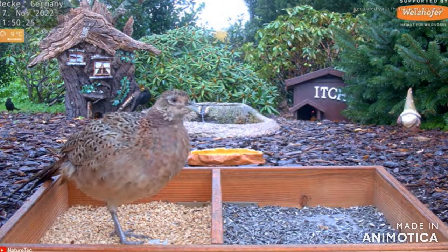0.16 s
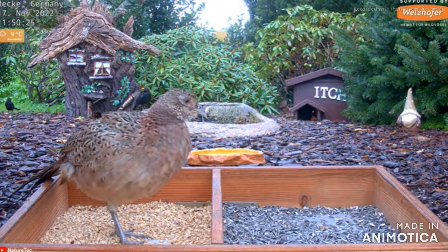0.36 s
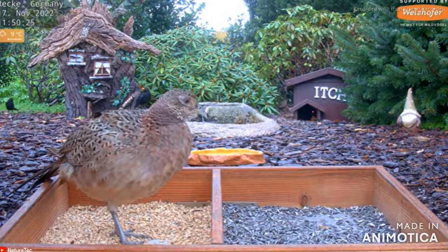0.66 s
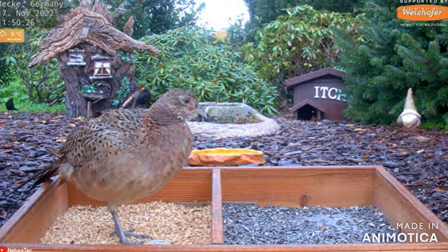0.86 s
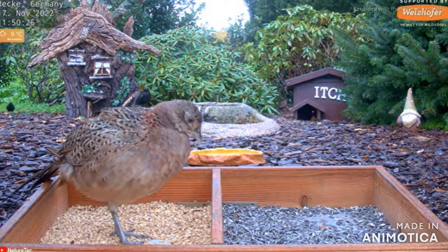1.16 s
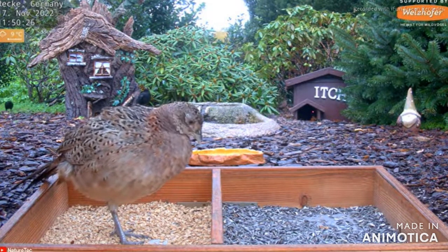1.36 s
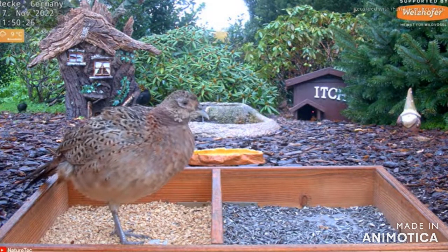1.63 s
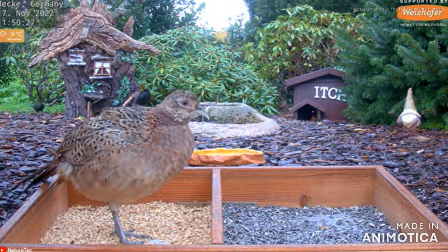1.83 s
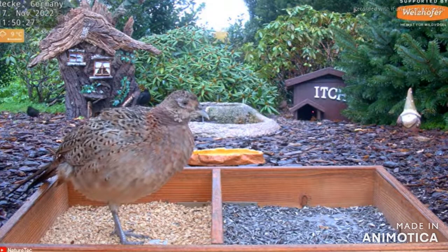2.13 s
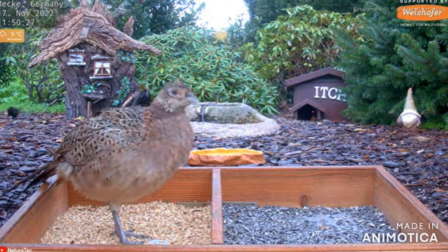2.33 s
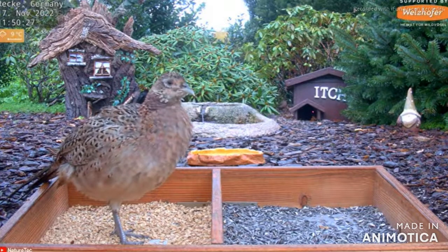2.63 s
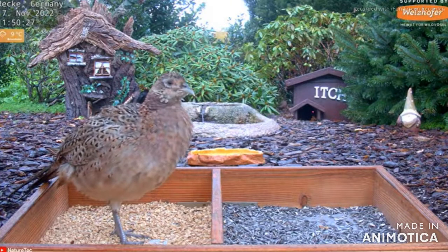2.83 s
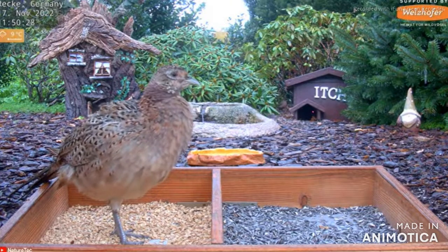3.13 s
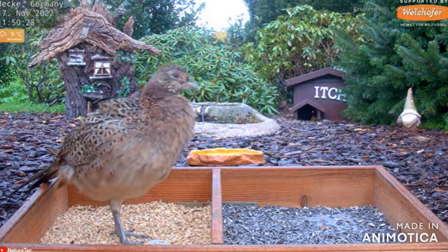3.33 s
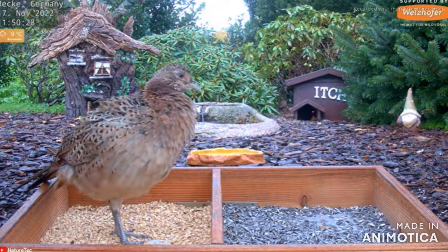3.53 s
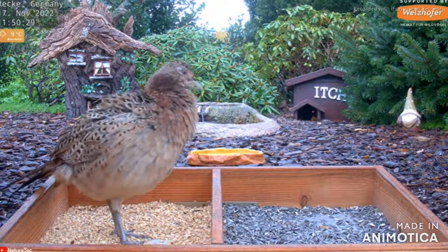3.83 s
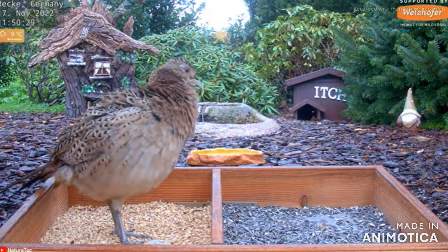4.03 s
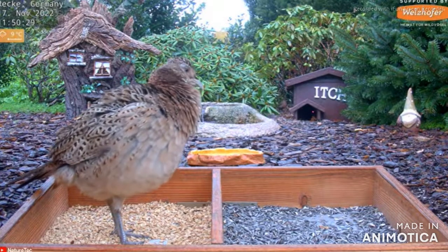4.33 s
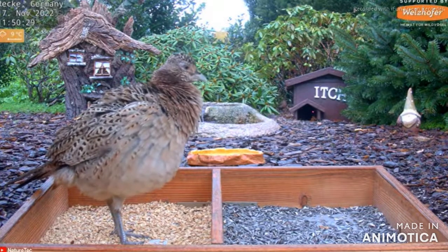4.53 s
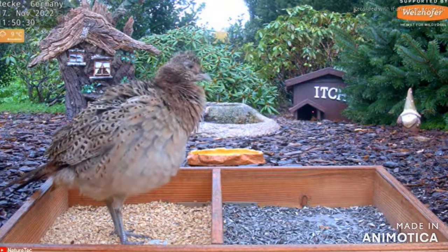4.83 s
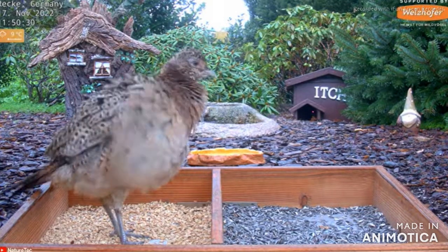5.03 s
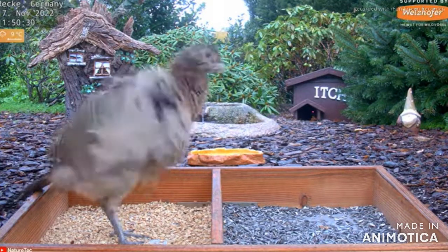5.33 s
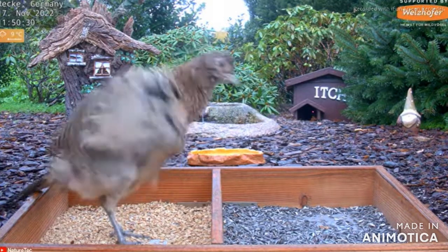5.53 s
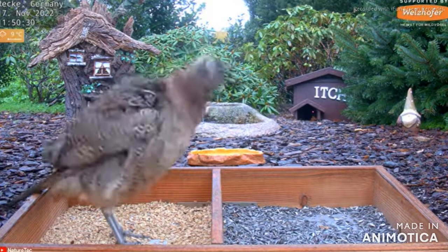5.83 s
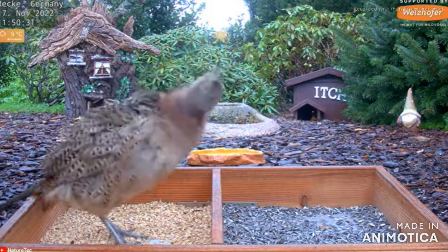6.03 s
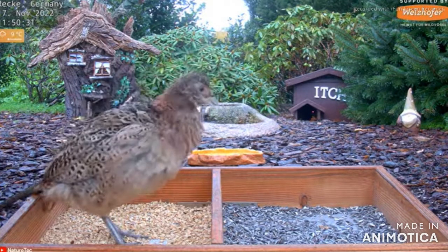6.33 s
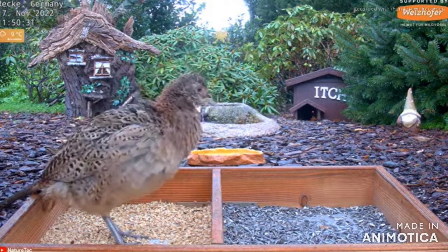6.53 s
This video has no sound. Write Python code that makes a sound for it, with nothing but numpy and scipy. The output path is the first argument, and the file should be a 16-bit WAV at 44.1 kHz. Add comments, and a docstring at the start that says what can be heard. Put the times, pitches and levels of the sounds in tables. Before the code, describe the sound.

Light rain hisses and ticks on wood and seed while sparrows twitter in a hedge; a pheasant shakes wet feathers, then a thin whistle.

```python
"""Garden rain and birds at a feeder

Light rain reaches one small microphone at a wooden feeder: coloured noise makes a soft wash and a far rumble,
and short shaped noise bursts tick on wood and seed. Sliding whistles chatter as sparrows in the hedge.
Dying tones drip into a puddle and step on the tray; a pheasant shakes wet feathers as swelling, grainy noise.
Near the end the tray rocks and a small bird gives one thin, high, warbling whistle."""
import sys
import numpy as np
from scipy import signal
from scipy.fft import rfft, irfft
from scipy.io import wavfile
from scipy.ndimage import uniform_filter1d

SR = 44100
rng = np.random.default_rng(int(sys.argv[2]) if len(sys.argv) > 2 else 0)


def output_pcm(signal):
    """Save a mono or channel-first signal as 16-bit PCM at the path in sys.argv[1].

    Samples are clipped to [-1, 1] before scaling.
    """
    pcm = np.clip(np.atleast_2d(signal).T, -1, 1) * 32767
    wavfile.write(sys.argv[1], SR, np.round(pcm).astype(np.int16))


def volts_from_db(level):
    """Convert decibel levels to linear amplitude ratios."""
    exponent = np.asarray(level, float) / 20
    return 10 ** exponent


N = 294147  # length in samples


def evened(x):
    """Scales a sound to rms 1."""
    return x / np.sqrt(np.mean(x ** 2) + 1e-20)


def read(points, hz):
    """Reads a spectrum in dB along a log-frequency axis."""
    f, value = np.transpose(points)
    return np.interp(np.log(hz + 1), np.log(f + 1), value)


def curves(rows):
    """Draws every column of a table as a line through time."""
    s, *columns = np.transpose(rows)
    return [np.interp(np.arange(N) / SR, s, c) for c in columns]


def add(mix, s, sound):
    """Mixes a sound in at s seconds."""
    part = mix[max(round(s * SR), 0):][:len(sound)]
    part += sound[:len(part)]


def wander(per_s):
    """Smooth random drift of rms 1 that turns about per_s times a second."""
    span = max(int(SR / per_s / 2), 1)
    smooth = uniform_filter1d(rng.standard_normal(N), span)
    return evened(uniform_filter1d(smooth, span))


def noise(spectrum, patchy_db, size=1024):
    """Noise of rms 1 from random short-time spectra with louder and softer patches."""
    hz = np.fft.rfftfreq(size, 1 / SR)
    real, imaginary, patches = rng.standard_normal((4 * N // size + 5, len(hz), 3)).T
    patches = uniform_filter1d(patches, size=12, axis=0)  # over neighbouring frequencies
    patches = evened(uniform_filter1d(patches, size=5, axis=1))  # over neighbouring frames
    z = (real + 1j * imaginary) * volts_from_db(read(spectrum, hz)[:, None] + patchy_db * patches)
    return evened(signal.istft(z, nperseg=size, noverlap=3 * size // 4)[1][:N])


def garden(x, t60):
    """Hedges and walls scatter a sound into a short decaying tail of energy 1."""
    t = np.arange(SR // 2) / SR
    tail = rng.standard_normal(len(t)) * volts_from_db(-60 * t / t60) * (t > .004)
    return signal.oaconvolve(x, tail / np.linalg.norm(tail))[:N]


# Tone of the far rain on leaves; only its shape counts: pitch_hz, level_db (per Hz)
WASH_TONE = [(280, -30), (480, -8.5), (762, -11), (1340, -5), (2350, -8.5), (3290, 2), (4170, -2),
             (9500, -25), (12400, -60), (20900, -120)]


def wash():
    """Far rain on leaves: coloured noise whose level drifts slowly and flutters fast."""
    level_db = -43 + .5 * wander(0.56) + 1.4 * wander(38)
    return volts_from_db(level_db) * noise(WASH_TONE, patchy_db=2.0)


# Tone of the rumble's body through the microphone's bass cut: pitch_hz, level_db (per Hz)
RUMBLE_BODY = [(15, -57.5), (25, -43.5), (50, -41), (80, -29.5), (100, -26), (125, -13.5), (160, -0.5),
               (190, 1.4), (250, -5.5), (320, -3.5), (400, -13.5), (500, -18.5), (700, -20), (1000, -60)]
# Tone of the rumble's upper part: pitch_hz, level_db (per Hz)
RUMBLE_UPPER = [(200, -38.5), (300, -11), (400, 4), (450, -4), (560, -35.5)]
# Swells of the upper part: time_s, level_db
RUMBLE_SWELL = [(0.0, -59.5), (0.31, -59), (0.72, -57), (1.5, -53.5), (1.95, -63), (2.34, -47.5),
                (2.69, -61), (3.55, -58), (3.99, -52), (4.75, -63), (5.46, -53), (5.63, -58), (6.67, -58)]


def rumble():
    """Far low noise whose upper part swells more than its body, so it brightens as it grows."""
    upper_db = curves(RUMBLE_SWELL)[0]
    body_db = -46.5 + 0.3 * (upper_db - upper_db.mean())  # the body follows by a share
    body = volts_from_db(body_db) * noise(RUMBLE_BODY, patchy_db=0.53, size=4096)
    return body + volts_from_db(upper_db) * noise(RUMBLE_UPPER, patchy_db=3.0, size=4096)


def tick(hz, low_db, high_db, octaves, draw, stretch=1):
    """A drop bursts: a few ms of noise with a ring, a low part and a high part; peak 1."""
    t = np.arange(len(draw)) / SR / stretch
    f = np.fft.rfftfreq(len(draw), 1 / SR)
    burst = rfft(draw * volts_from_db(-60 * t / 0.012) * np.minimum(t / 0.0024, 1) ** 2)
    # level the spectrum to an even snap, ready to be coloured
    burst = burst / np.sqrt(uniform_filter1d(abs(burst) ** 2, size=len(draw) // 50))

    def bump(centre_hz, wide):
        return np.exp(-(np.log2((f + 1) / centre_hz) / max(wide, .03)) ** 2)

    colour = bump(hz, octaves) + volts_from_db(low_db) * bump(1700, .6) + volts_from_db(high_db) * bump(6800, .65)
    out = np.roll(irfft(burst * colour), 80)  # room ahead of the snap for its onset
    return out / abs(out).max()


def patter():
    """Smaller drops at random, each with one ring from a set of 24; a few are larger."""
    per_s, level_db = 160, -56.5
    size = volts_from_db(2.4 * np.minimum(rng.exponential(1, N), 3)) * (rng.random(N) < per_s / SR)
    kind, out = rng.integers(0, 24, N), np.zeros(N)
    for k, octave in enumerate(rng.uniform(-1.6, .8, 24)):
        grain = tick(4000 * 2 ** octave, -39.5, -21.0, 0.19, rng.standard_normal(1024))
        out += signal.oaconvolve(size * (kind == k), grain)[:N]
    return volts_from_db(level_db) * evened(out)


def chirp(length_s, start_hz, end_hz, burr):
    """A short whistle that slides fast and settles; low voices have a rougher pitch."""
    u = np.linspace(0, 1, int(length_s * SR))
    roughness = np.interp(start_hz, [3700, 4050], [.052, .032])
    rough = 1 + roughness * evened(uniform_filter1d(burr, size=60))[:len(u)]
    slide = np.sin(np.pi / 2 * u)
    pitch_hz = (start_hz + (end_hz - start_hz) * slide) * rough
    return np.sqrt(abs(np.sin(np.pi * u))) * np.sin(2 * np.pi * np.cumsum(pitch_hz) / SR)


# The far flock, too many to tell apart, before the hedge: time_s, level_db
FLOCK_LEVEL = [(0.0, -62), (0.7, -52), (1.0, -41.5), (1.78, -48.5), (1.95, -43), (2.36, -54), (2.71, -46.5),
               (3.29, -50), (3.51, -51.5), (4.38, -54), (4.81, -42), (5.2, -61), (5.54, -41), (6.17, -48),
               (6.67, -52.5)]
# Single chirps, before the hedge: start_s, length_s, start_hz, end_hz, level_db
NEAR_CHIRPS = [(0.83, 0.052, 2894, 3620, -29), (1.13, 0.076, 3110, 3650, -38),
               (1.366, 0.048, 4163, 3565, -27.5), (1.455, 0.055, 3200, 2920, -33.5),
               (1.527, 0.025, 3446, 3430, -30), (2.053, .1, 4030, 3640, -30.5),
               (2.717, 0.018, 4120, 4200, -29), (3.217, 0.054, 3550, 4060, -31),
               (3.26, 0.067, 3364, 3040, -33), (3.404, 0.052, 4420, 4186, -34.5),
               (3.629, 0.078, 3570, 3510, -34.5), (3.832, 0.047, 4250, 4190, -32),
               (3.857, 0.066, 3950, 3780, -30.5), (3.909, 0.046, 3550, 3360, -34.5),
               (4.055, 0.04, 3000, 3310, -36.5), (4.814, 0.038, 3980, 3660, -33.5),
               (4.858, 0.071, 3236, 3160, -33.5), (5.374, 0.05, 4433, 4690, -32),
               (5.413, 0.046, 4130, 3945, -31.5), (5.444, 0.061, 3740, 3530, -29.5),
               (5.805, 0.024, 3350, 3500, -33.5), (6.422, 0.022, 3970, 4080, -30),
               (6.436, 0.078, 3475, 3130, -35.5)]


def sparrows():
    """A few chirps stand out of a dense twitter of mostly falling notes; the hedge smears both."""
    starts, kind = rng.random(N) < 160 / SR, rng.integers(0, 40, N)  # about 160 notes a second
    flock, near = np.zeros(N), np.zeros(N)
    for k, (length, pitch, slide) in enumerate(rng.random((40, 3))):
        hz = 2600 + 1950 * ((k + pitch) / 40) ** 1.3  # more voices low than high
        start_hz, end_hz = hz * (.95 + .15 * slide), hz * (1.03 - .12 * slide)
        note = chirp(.015 + .04 * length, start_hz, end_hz, rng.standard_normal(SR // 4))
        flock += signal.oaconvolve(1. * starts * (kind == k), note)[:N]
    burrs = rng.standard_normal((len(NEAR_CHIRPS), SR // 4))
    for (s, *shape, db), burr in zip(NEAR_CHIRPS, burrs):
        add(near, s, volts_from_db(db) * chirp(*shape, burr))
    birds = near + evened(flock) * volts_from_db(curves(FLOCK_LEVEL)[0])
    return volts_from_db(-7.5) * birds + volts_from_db(-5.5) * garden(birds, 0.19)


# Near drops; low and high parts are relative to the ring:
# time_s, level_db, ring_hz, low_part_db, high_part_db
NEAR_DROPS = [(0.06, -29.5, 2730, -25, -12), (0.071, -24, 4700, -21, -19), (0.0923, -34, 5770, -16, -20),
              (0.1908, -32, 3720, -24, -20), (0.213, -30, 4150, -29, -19), (0.219, -29, 5340, -27, -17),
              (0.2427, -25, 4940, -28, -33), (0.5388, -35, 5580, -15, -22), (0.582, -31, 4100, -8, -14),
              (0.648, -37, 7750, -25, -4), (0.703, -33, 5800, -7, -16), (0.7825, -20.5, 3300, -11, -18),
              (0.802, -12, 4900, -30, -9), (0.812, -23.5, 3330, -14, -30), (0.846, -20, 3100, -15.5, -26),
              (0.9194, -28, 7000, -12, -6), (1.062, -29, 5550, -19, -20), (1.1225, -25.5, 4450, -14, -16),
              (1.3201, -20.5, 5300, -33, -34), (1.376, -22.5, 4170, -9, -19),
              (1.3874, -17.5, 3640, -10, -2.5), (1.4156, -28, 4700, -25, -28), (1.677, -35, 6400, -10, -12),
              (1.7457, -23.5, 3170, -33, -42), (1.78, -21, 3100, -6, -13.5), (1.7904, -22, 5500, -3, -14),
              (1.808, -27.5, 3140, -15, -26), (1.824, -24, 3150, -20, -26), (1.831, -21, 3200, -18, -14),
              (1.872, -27.5, 3160, -27, -28), (1.982, -22, 6240, -20, -15), (1.993, -37, 5400, -15, -12),
              (2.006, -38, 6150, -9, -23), (2.032, -33, 3730, -14, -27), (2.045, -33, 6100, -15, -9),
              (2.0505, -25.5, 3800, -1.5, -5), (2.142, -25, 3320, -14, -12.5),
              (2.2195, -32, 5300, -20, -18), (2.229, -32, 4400, -26, -17), (2.3485, -27, 3000, -20, -25),
              (2.386, -23, 4100, -7, -17.5), (2.4653, -24, 3630, -22, -8), (2.5234, -33, 6030, -23, 3.5),
              (2.553, -25.5, 3203, -11, 10), (2.5605, -27.5, 5000, -15, -8), (2.57, -27, 5430, -20, -11),
              (2.7879, -17.5, 3450, -8, -15.5), (2.824, -24.5, 3700, -37, -29),
              (2.9458, -38, 5540, -20, -6), (3.1172, -25, 2550, -7, -7.5), (3.146, -23, 3030, -14.5, -12),
              (3.1943, -27.5, 4570, -13, -17), (3.353, -27, 4400, -31, -16), (3.5352, -25, 3130, -22, 5),
              (3.648, -25, 3520, -33, -25.5), (3.72, -32, 4900, -22, -17), (3.764, -30, 4650, -17, -20.5),
              (3.7932, -19.5, 3280, -8.5, -27), (3.804, -28, 4120, -16, -23),
              (3.8462, -30.5, 4300, -21, -13), (3.8917, -19, 3860, -32, -39), (4.0168, -29, 4680, -23, -23),
              (4.208, -39, 4540, -12, -17), (4.229, -33, 5430, -29, -22), (4.252, -39, 7600, -25, -1),
              (4.2643, -27.5, 4060, -15, -15), (4.293, -17.5, 5400, -32, -22), (4.527, -13.5, 4400, -34, 2),
              (4.7213, -33, 5030, -15, -7), (4.786, -28, 5500, -25, -19), (4.79, -14, 3260, -5.5, -16),
              (4.988, -28.5, 4060, -25, -31), (5.019, -25.5, 4540, -30, -35),
              (5.029, -28.5, 3650, -31, -31), (5.065, -34, 6380, -25, -16), (5.151, -40, 4900, -9, -2.5),
              (5.3318, -28.5, 1410, 0, -35), (5.677, -23, 4700, -14, -40), (5.761, -18, 3520, -4, -20),
              (5.879, -35.5, 5940, -9, -22), (6.0604, -24.5, 5400, -20, -16.5),
              (6.108, -31, 2980, -0.5, -9), (6.2964, -25, 3480, -2, -39), (6.52, -27, 3330, -29, -37),
              (6.623, -31, 6000, -28, -5)]


def drops():
    """Near drops, each with its own colour; two droplets splash back just after."""
    out, count = np.zeros(N), len(NEAR_DROPS)
    draws, splashes = rng.standard_normal((count, 2048)), rng.random((count, 2, 2))
    stretches = rng.uniform(.85, 1.45, count)  # some click and some splat
    for (s, db, *colour), draw, splash, stretch in zip(NEAR_DROPS, draws, splashes, stretches):
        octaves = 0.23 + 0.04 * (db + 27.5)  # harder drops ring broader
        sound = volts_from_db(db) * tick(*colour, octaves, draw, stretch)
        add(out, s - 80 / SR - .0008 * stretch, sound)  # the snap itself lands near s
        for late, small in splash:
            add(out, s + 0.0022 + 0.012 * late, volts_from_db(-12.0 - 9 * small) * sound)
    return out + volts_from_db(-10.5) * garden(out, 0.14)


def rings(rows, t60, rise_s, glide):
    """Dying tones with a soft onset, whose pitch climbs as they fade."""
    out, t = np.zeros(N), np.arange(4096) / SR
    for s, db, hz in rows:
        rise = np.sin(np.pi / 2 * np.minimum(t / rise_s, 1)) ** 2
        add(out, s, volts_from_db(db - 60 * t / t60) * rise * np.sin(2 * np.pi * hz * t * (1 + glide * t)))
    return out


# Drips into a puddle, level before the soft onset, pitch at the start: start_s, level_db, pitch_hz
PUDDLE_DRIPS = [(0.3345, -31, 1280), (0.9112, -29.5, 1056), (1.814, -29, 1264), (1.8307, -27.5, 1223),
                (4.4714, -31, 1100), (5.5518, -29.5, 1630), (5.5952, -32, 1430), (5.9925, -32, 1770)]


def drips():
    """Drips into a puddle: brief dying tones that climb in pitch."""
    return rings(PUDDLE_DRIPS, t60=0.042, rise_s=0.0041, glide=0.97)


# Foot on the tray, level before onset and bass cut, pitch at the start: start_s, level_db, pitch_hz
TRAY_STEPS = [(1.291, -19, 233), (5.513, -21, 216), (5.598, -25, 247), (5.917, -20.5, 280),
              (5.94, -20.5, 251), (6.247, -21, 167), (6.298, -10.5, 251)]


def footsteps():
    """Steps on the wooden tray: low dying tones, thinned below by the microphone's bass cut."""
    thuds = rings(TRAY_STEPS, t60=0.043, rise_s=0.01, glide=.1)
    return signal.lfilter(*signal.butter(2, 110, "high", fs=SR), thuds)


def swell(s, length_s, db):
    """One smooth rise and fall of level."""
    return volts_from_db(db) * np.sin(np.pi * np.clip((np.arange(N) / SR - s) / length_s, 0, 1))


# Bouts of rustle that swell and fade: start_s, length_s, level_db
SHAKE_BOUTS = [(5.296, 0.49, -45.5), (5.772, 0.38, -46)]
# Single flaps in the shake, level before the soft onset: start_s, level_db
WING_FLAPS = [(5.328, -35), (5.355, -37), (5.413, -40), (5.48, -42), (5.549, -35), (5.566, -43),
              (5.593, -35), (5.759, -35), (5.87, -41), (5.93, -41), (5.988, -35), (6.03, -36), (6.104, -40)]


def feathers():
    """Grainy rustle in puffs as the wings beat against the body, over a soft low whoosh."""
    level, t = sum(swell(*row) for row in SHAKE_BOUTS), np.arange(8192) / SR
    rise_s, t60_s = 0.005, 0.085
    for s, db in WING_FLAPS:
        add(level, s, np.minimum(t / rise_s, 1) * volts_from_db(db - 60 * t / t60_s))
    # tones: (Hz, dB per Hz)
    rustle_tone = [(600, -26), (1000, -6.0), (1400, 0.5), (2200, -1.0), (3200, -3), (5200, -2.5), (8000, -18)]
    whoosh_tone = [(100, -40), (180, -3), (280, 0.0), (420, -11), (600, -44)]
    rustle = noise(rustle_tone, patchy_db=3.0, size=512)
    whoosh = noise(whoosh_tone, patchy_db=4.0, size=2048)
    grainy = volts_from_db(-3.0 + 2.2 * wander(25) + 3.0 * wander(170))
    return level * grainy * rustle + volts_from_db(-3.5) * uniform_filter1d(level, size=700) * whoosh


def tray():
    """The tray rocks under the bird's weight: one swell of low, lumpy noise."""
    tone = [(30, -42), (70, -21), (135, 9), (190, -4), (300, -51)]  # (Hz, dB per Hz)
    return swell(6.03, length_s=0.3, db=-47) * noise(tone, patchy_db=3.5, size=4096)


# Thin high call, level before the echo is mixed in: time_s, level_db, pitch_hz
SEEP_CALL = [(6.358, -53, 6500), (6.372, -48, 7370), (6.384, -56, 7660), (6.398, -55, 7460),
             (6.408, -33.5, 7340), (6.416, -54, 7800), (6.424, -47, 8130), (6.44, -37, 7600),
             (6.452, -31.5, 7100), (6.461, -37, 7850), (6.472, -38, 8040), (6.482, -42, 7970),
             (6.49, -36, 7720), (6.504, -45, 7470), (6.52, -44, 7670), (6.533, -42, 8020),
             (6.545, -41, 7500), (6.555, -31.5, 7330), (6.567, -38, 7620), (6.592, -49, 7410),
             (6.615, -76, 7650)]


def seep():
    """A thin whistle that warbles up and down; its echo fills the gaps."""
    db, hz = curves(SEEP_CALL)
    t = np.arange(N) / SR
    warble_hz = uniform_filter1d(hz, size=120) + 75 * wander(260)
    sounding = (t > SEEP_CALL[0][0]) & (t < SEEP_CALL[-1][0])
    whistle = np.sqrt(2) * np.sin(2 * np.pi * np.cumsum(warble_hz) / SR)  # rms 1
    call = sounding * volts_from_db(db) * whistle
    return volts_from_db(-3.0) * call + volts_from_db(-6.0) * garden(call, 0.17)


def scene():
    """All sources reach the one microphone, alike on both channels."""
    rain = wash() + rumble() + patter() + drops() + drips()
    animals = sparrows() + footsteps() + feathers() + tray() + seep()
    mono = rain + animals
    return np.array([mono, mono])


def thinned(x, below_db, keep_db, size, span, frames):
    """Turns down short-time bins that lie under their neighbours, above all in the treble."""
    window = np.sin(np.pi * (np.arange(size) + .5) / size)
    hz, _, z = signal.stft(x, SR, window=window, nperseg=size, noverlap=size // 2)
    power = uniform_filter1d(abs(z) ** 2, size=frames, axis=-1)
    near = uniform_filter1d(power, size=span, axis=-2)
    far = uniform_filter1d(power, size=3 * span, axis=-2) * (hz > 4500)[:, None]
    # the margin shrinks towards the top, so more bins fall there
    margin_db = below_db * np.interp(hz, [900, 2500, 3200, 6000], [20, 4, 1.7, 1])[:, None]
    weak = abs(z) ** 2 < np.maximum(near, .15 * far) * volts_from_db(-2 * margin_db)
    # whole narrow bands drop too
    weak |= uniform_filter1d(power, size=span // 6, axis=-2) < near * volts_from_db(-2 * margin_db - 5)
    z = np.where(weak, z * volts_from_db(keep_db), z)
    return signal.istft(z, SR, window=window, nperseg=size, noverlap=size // 2)[1][..., :N]


def flickering_treble(x):
    """Weak treble drops out in patches: long and deep in the hiss, short and shallower around clicks."""
    top = signal.lfilter(*signal.butter(4, [4900, 6300], "band", fs=SR), x[0]) ** 2
    power = uniform_filter1d(top, size=130)
    usual = signal.medfilt(power[::64], 201).repeat(64)[:N]
    click = power > 7 * usual
    around = uniform_filter1d(1. * click, size=1300) > 1e-4
    short = uniform_filter1d(1. * around, size=200)  # crossfade
    brief = thinned(x, below_db=.9, keep_db=-16, size=384, span=8, frames=5)
    lasting = thinned(x, below_db=.9, keep_db=-30, size=1536, span=40, frames=1)
    return short * brief + (1 - short) * lasting


def top_cut(x):
    """Nothing passes above the cut-off."""
    return signal.sosfilt(signal.butter(12, 10540, fs=SR, output="sos"), x)


def record(dry):
    """A steep low-pass closes the top at 9684 Hz, then the weak treble flickers."""
    edge = signal.firwin(281, 9684, window=("kaiser", 5.5), fs=SR)
    mix = flickering_treble(signal.oaconvolve(dry, edge[None], "same"))
    return top_cut(mix)


dry = scene()
out = record(dry)
output_pcm(out)
```